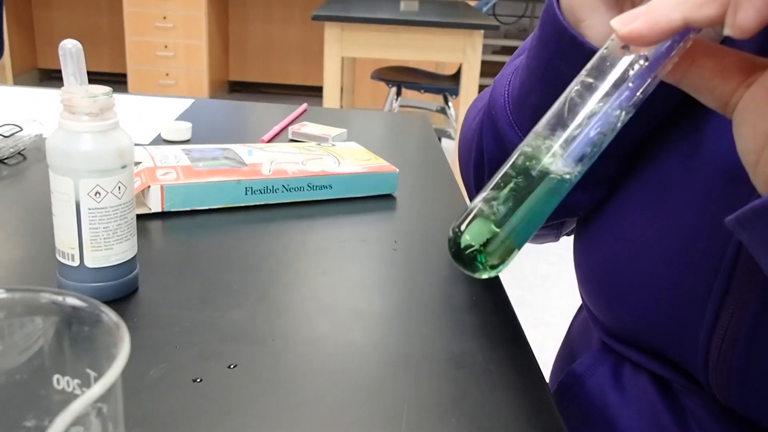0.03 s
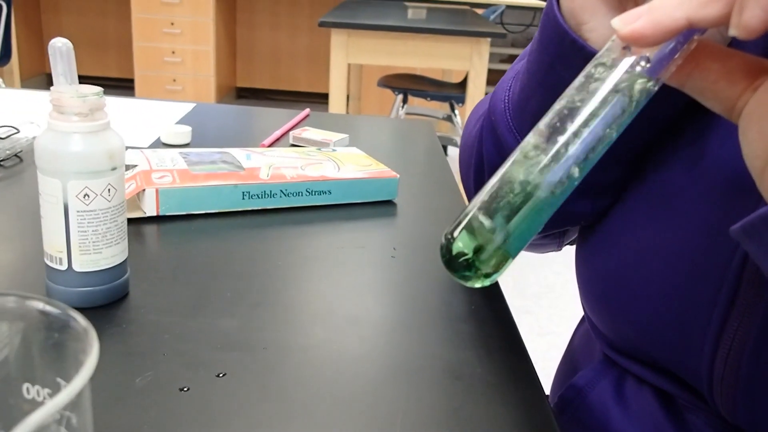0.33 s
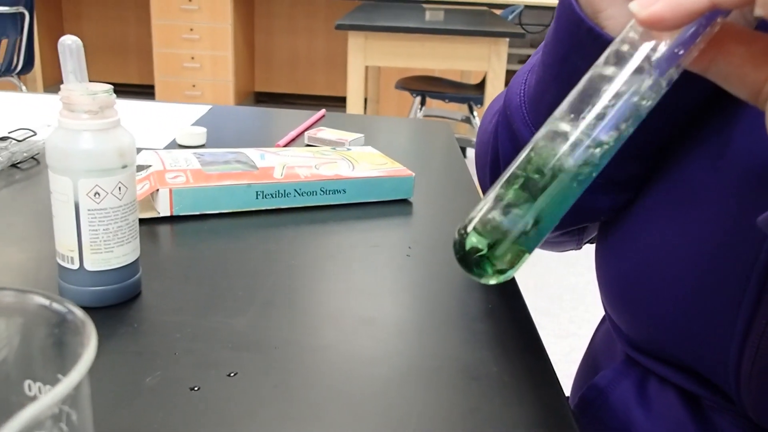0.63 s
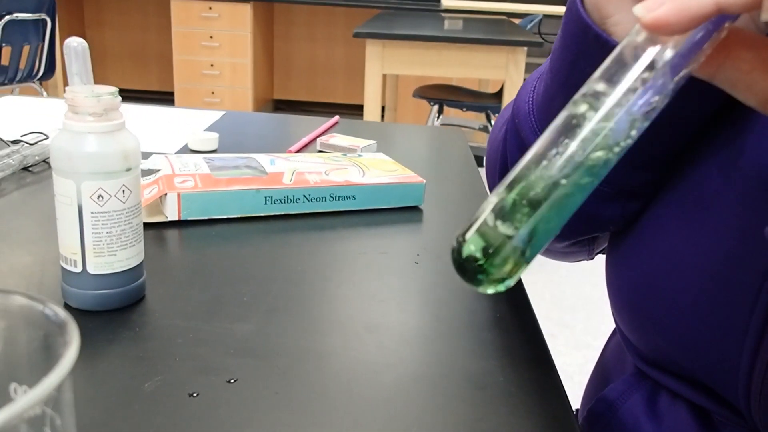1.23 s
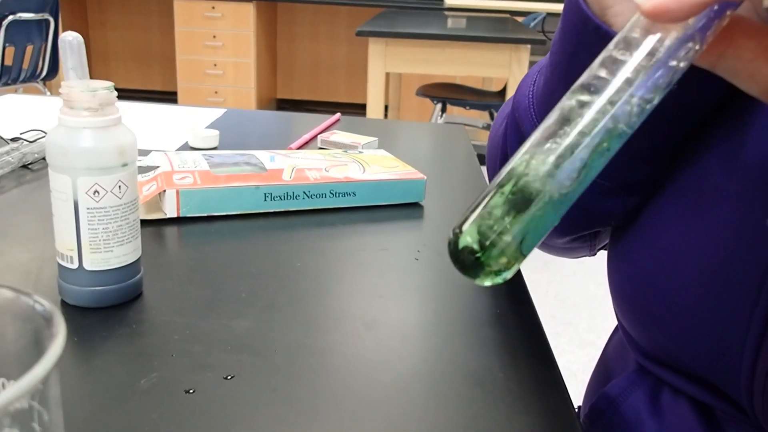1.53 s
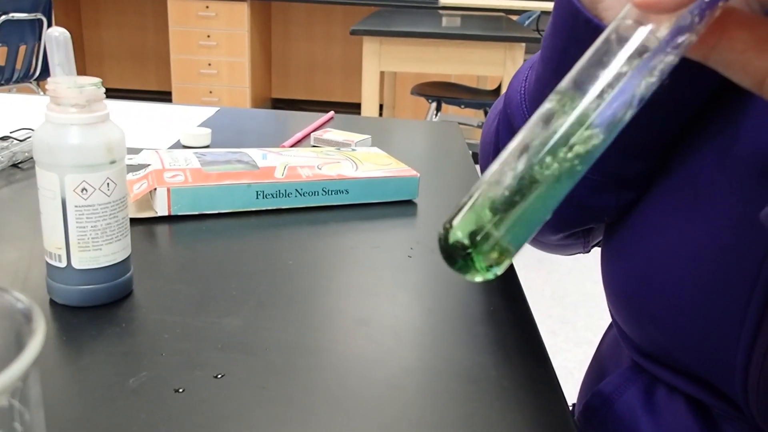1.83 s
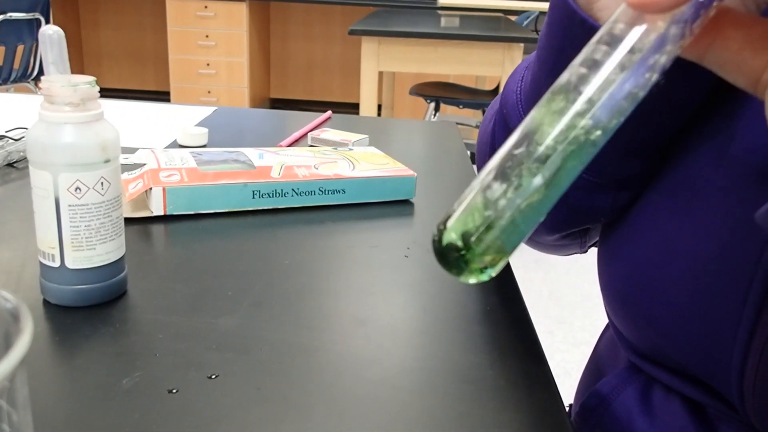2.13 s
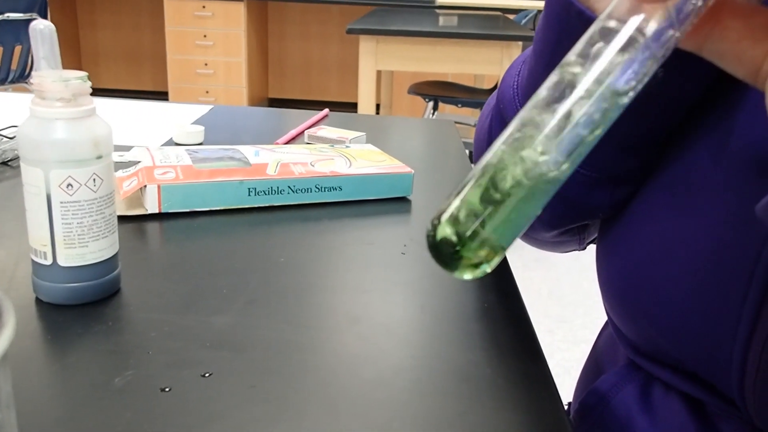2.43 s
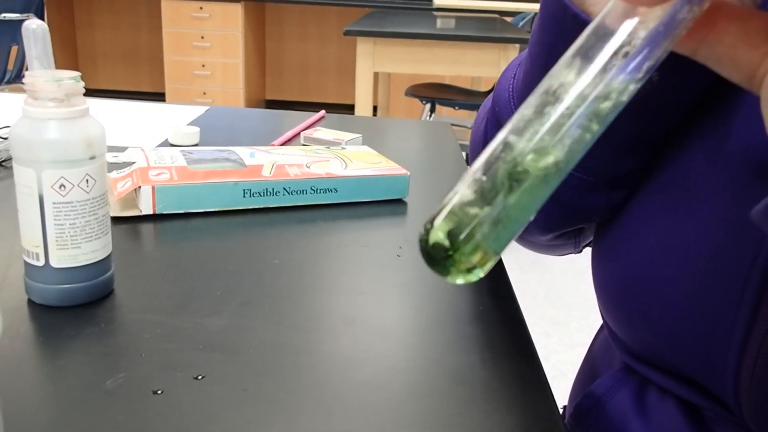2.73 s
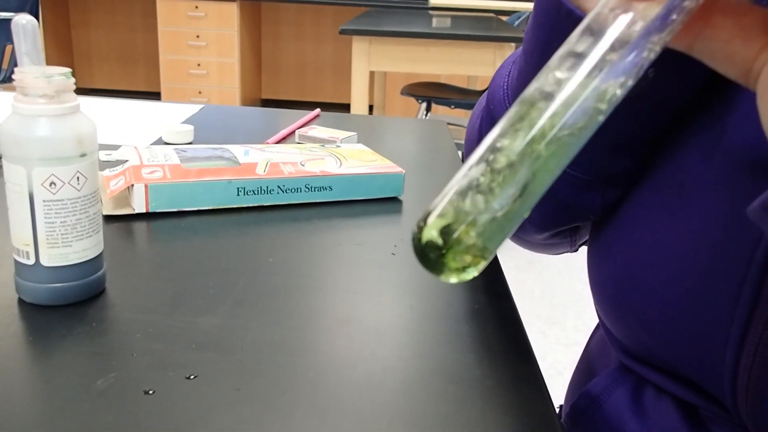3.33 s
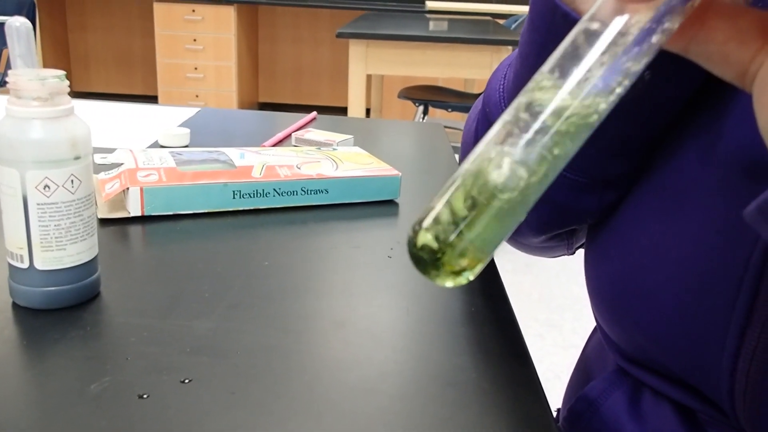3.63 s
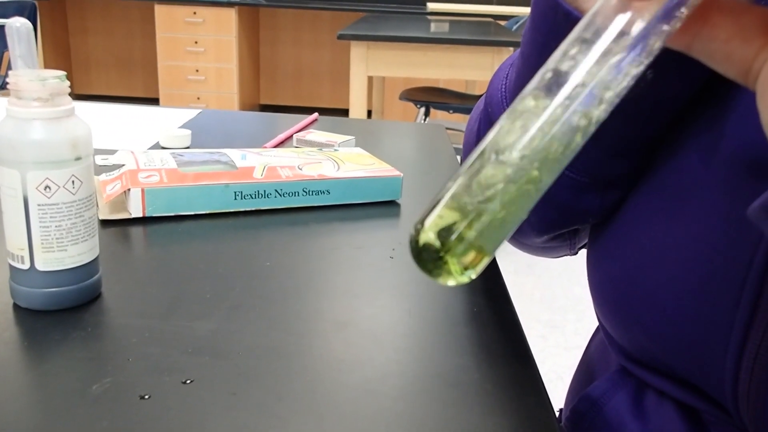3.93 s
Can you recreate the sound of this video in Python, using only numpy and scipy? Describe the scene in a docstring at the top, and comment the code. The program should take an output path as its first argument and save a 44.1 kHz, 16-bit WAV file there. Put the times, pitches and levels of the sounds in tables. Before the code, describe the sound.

Liquid bubbles and fizzes in a test tube for the whole four seconds, close and to the right. Irregular hollow pops and short rising plips mix with tiny ticks of foam. Puffs of air bump the microphone on the left, several in the first second, the strongest at about 2.4 seconds, and a few more after 3 seconds. Faint room ventilation rumbles and hisses underneath.

```python
"""A classroom, close up: liquid fizzes in a hand-held test tube just right of a camera's stereo microphones.
Ventilation rumbles and hisses throughout. From the start, bubbles burst and ring, most rising in pitch,
the air column in the tube answers, and puffs of air bump the left microphone port. Tiny bubbles tick in
the foam all along, and from 0.1 s on an occasional bubble swells with a soft upward glide.
The strongest puff lands at about 2.4 s; the fizzing carries on to the end."""
import sys
import numpy as np
from scipy import signal
from scipy.fft import rfft, irfft, next_fast_len
from scipy.io import wavfile
from scipy.ndimage import map_coordinates

SR = 44100
rng = np.random.default_rng(int(sys.argv[2]) if len(sys.argv) > 2 else 0)


def persist_wave(psi):
    """Save psi, clipped to +-1, as 16-bit WAV."""
    counts = np.round(np.clip(psi, -1, 1) * 32767).astype(np.int16)
    wavfile.write(sys.argv[1], SR, np.atleast_2d(counts).T)


N = 176400
T = np.arange(SR // 8) / SR  # time within one short sound [s]

# room tone, low and high: ventilation spectra (frequency [Hz], relative level [dB])
RUMBLE_COLOUR = [(22, -7), (40, 5.5), (80, 6), (250, -3), (420, -10.5), (510, -4.5), (650, -13), (780, -10),
                 (880, -15.5), (1500, -21.5), (3000, -48.5)]
HISS_COLOUR = [(500, 2.5), (1500, 2.5), (3000, 0.5), (4600, -7.5), (5500, 4.5), (6600, 2), (7700, 8.5),
               (8600, 5), (9400, -3), (10300, 0), (13000, -1), (16000, -1.5)]
# fans and equipment in the room (frequency [Hz], level [dB])
FAN_TONES = [(41.6, -56), (6181, -73.5)]
# bubbles that ring as they open
# (time [s], relative level [dB], pitch [Hz], t60 [s], rise over the t60 [share of pitch])
RINGING_BUBBLES = [(0.0095, -20, 3020, 0.006, 0.0), (0.138, -24, 988, 0.05, 0.074),
                   (0.1372, -22.5, 553, 0.043, 0), (0.3647, -19.5, 520, 0.033, 0.0),
                   (0.4038, -20.5, 650, 0.007, 0.067), (0.4278, -29.5, 1270, 0.028, 0.16),
                   (0.4289, -20.5, 597, 0.03, 0.0), (0.4533, -29, 516, 0.063, 0.73),
                   (0.5689, -28.5, 964, 0.061, 1.26), (0.57, -19.5, 600, 0.021, 1.87),
                   (0.5992, -29.5, 1270, 0.016, 0.3), (0.6016, -18.5, 530, 0.019, 0.15),
                   (0.6998, -22.5, 214, 0.065, 0.12), (0.7536, -32, 1127, 0.051, 0.22),
                   (0.754, -18.5, 334, 0.024, 0.76), (0.7613, -20.5, 468, 0.04, 0.45),
                   (0.7748, -32, 1220, 0.032, 0.54), (0.7744, -30, 468, 0.079, 1.24),
                   (0.8181, -16.5, 640, 0.016, 1.2), (0.823, -44, 1750, 0.068, 0.71),
                   (0.8387, -23, 528, 0.053, 0.29), (0.8392, -26, 1140, 0.013, 0.33),
                   (0.896, -31, 523, 0.077, 0), (0.9459, -32.5, 975, 0.031, 0.055),
                   (1.0222, -26, 224.5, 0.071, 0.094), (1.0793, -31.5, 1360, 0.035, 0.2),
                   (1.0762, -22, 587, 0.033, 0.15), (1.0764, -20, 1060, 0.0059, 0.87),
                   (1.2175, -36, 1510, 0.019, 0), (1.2176, -31.5, 488, 0.083, 0),
                   (1.339, -31, 963, 0.029, 0.64), (1.3719, -23, 1220, 0.0081, 0.2),
                   (1.4517, -25, 410.0, 0.037, 0.57), (1.5905, -36.5, 1490, 0.02, 0),
                   (1.762, -19, 533, 0.021, 0.53), (1.762, -28.5, 975, 0.045, 0.74),
                   (1.7722, -18.5, 477, 0.018, 0.36), (2.0352, -25, 745, 0.037, 0.14),
                   (2.0736, -18, 625, 0.013, 0), (2.0761, -26.5, 890, 0.039, 0.5),
                   (2.0809, -17, 514, 0.026, 0), (2.2067, -22.5, 968, 0.036, 0.79),
                   (2.2084, -25, 522, 0.025, 0.15), (2.2387, -17, 665, 0.013, 0.65),
                   (2.4082, -25.5, 710, 0.044, 0.56), (2.4089, -33, 1422, 0.03, 0.38),
                   (2.5764, -17, 546, 0.016, 0), (2.585, -41, 1418, 0.073, 0.072),
                   (2.5946, -37, 940, 0.046, 0.21), (2.5932, -15.5, 620, 0.014, 0.27),
                   (2.6133, -23.5, 494, 0.023, 1.8), (2.614, -39, 1260, 0.03, 0.18),
                   (2.7705, -17, 554, 0.027, 0.21), (2.7709, -21.5, 1056, 0.02, 0.037),
                   (2.7836, -19.5, 606, 0.015, 0.88), (2.8622, -18, 537, 0.041, 0.06),
                   (2.942, -22, 520, 0.028, 0.0), (2.948, -35, 1003, 0.04, 0.24),
                   (3.027, -26.5, 216, 0.078, 0), (3.111, -23.5, 509, 0.045, 0),
                   (3.1111, -26, 1230, 0.012, 0.72), (3.124, -29, 1497, 0.051, 0.59),
                   (3.1248, -25.5, 2750, 0.018, 0.62), (3.139, -38, 1800, 0.02, 1.1),
                   (3.1702, -29, 562, 0.065, 0.21), (3.1816, -26, 755, 0.087, 0.21),
                   (3.3754, -29.5, 304, 0.067, 0.49), (3.4529, -21, 309, 0.034, 0.7),
                   (3.462, -40, 1680, 0.025, 0.094), (3.529, -35, 2050, 0.03, 0.32),
                   (3.5281, -18, 487, 0.04, 0.17), (3.5902, -26.5, 505, 0.052, 0.1),
                   (3.627, -36, 1840, 0.015, 0.3), (3.698, -19, 553, 0.028, 0.95),
                   (3.8468, -20, 650, 0.023, 1), (3.855, -17, 548, 0.021, 1.26),
                   (3.8975, -26.5, 1050, 0.029, 0.94), (3.898, -29.5, 594, 0.05, 0.099),
                   (3.9607, -30, 1540, 0.017, 0), (3.9622, -17, 645, 0.017, 0.78),
                   (3.9753, -23.5, 3040, 0.01, 0.1)]
# large bubbles that burst at once (time [s], relative level [dB])
LARGE_POPS = [(0.5275, -23), (0.5996, -15.5), (0.7552, -31), (0.943, -27.5), (1.024, -30.5), (1.09, -24.5),
              (1.1397, -24.5), (1.2182, -22), (1.2933, -27.5), (1.3382, -23.5), (1.365, -23), (1.448, -21),
              (1.5348, -26), (1.622, -24), (1.711, -26), (1.848, -25.5), (1.9733, -25), (2.0357, -24.5),
              (2.151, -27.5), (2.2065, -25), (2.329, -26), (2.389, -33), (2.4101, -20.5), (2.4367, -23),
              (2.5224, -24.5), (3.102, -18.5), (3.1934, -26.5), (3.208, -22.5), (3.2825, -21),
              (3.3749, -19.5), (3.4573, -25.5), (3.5281, -20.5), (3.6548, -22.5), (3.7206, -26.5),
              (3.8666, -22), (3.8975, -24.5), (3.921, -30), (3.9599, -19)]
# modes of the air in the tube (frequency [Hz], relative level [dB], t60 [s])
TUBE_MODES = [(330.6, 4, 0.016), (500.4, 3.5, 0.026), (760, -45, 0.0023), (746, -14, 0.082),
              (1092, -37, 0.13), (1594, -21, 0.018), (2170, -50, 0.03), (2925, -29.5, 0.066)]
# the wet splash of a ringing bubble (frequency [Hz], gain [dB])
SPLASH_COLOUR = [(500, -13), (1500, 16), (3000, -27), (3500, -45), (16000, -22)]
# puffs of air on the left port (time [s], relative level [dB])
AIR_PUFFS = [(0.02, -16), (0.209, -15), (0.353, -23), (0.525, -18), (0.752, -13.5), (0.778, -18),
             (0.805, -20.5), (1.186, -23.5), (2.425, -10), (3.078, -18.5), (3.465, -20), (3.484, -20.5),
             (3.555, -23.5)]
# higher tube modes that tiny bubbles reach (frequency [Hz])
UPPER_MODES = [1547, 2040, 2960, 3830, 5300, 7300]
# tiny bubbles snapping (time [s], relative level [dB], pitch [Hz], offset of the bright snap [dB])
FOAM_TICKS = [(0.2874, -39.5, 2900, -3), (0.3927, -38.5, 3900, 6), (0.429, -30.5, 5520, -21),
              (0.4638, -34.5, 3850, -27), (0.577, -35, 2720, -22), (0.591, -37, 6960, -22),
              (0.8108, -39.5, 6860, 5), (1.0213, -43, 2860, -24), (1.079, -36.5, 7440, -17),
              (1.3654, -32, 3940, -32), (1.433, -42, 7200, -7), (1.5194, -35.5, 2630, 1),
              (1.841, -40, 2260, -24), (1.8532, -31, 4960, -14), (2.0788, -39, 5420, -27),
              (2.157, -39, 7480, -21), (2.3203, -39, 2610, -19), (2.471, -41.5, 2470, -24),
              (2.576, -39.5, 5280, -22), (2.586, -36, 7050, -18), (2.7658, -39.5, 8000, -15),
              (2.9462, -33, 3860, -18), (2.9547, -36, 5180, -20), (3.1238, -30, 2855, -1.5),
              (3.236, -41, 5270, -21), (3.3625, -32.5, 5200, -26), (3.529, -39, 3900, -20),
              (3.542, -34, 5730, -20), (3.6489, -35.5, 2650, 5.5), (3.7298, -37.5, 7900, -7),
              (3.961, -36, 5260, -22), (3.9742, -32.5, 3020, -33)]
# a sharp crack leaving the tube (frequency [Hz], gain [dB])
CRACK_COLOUR = [(300, -54), (1500, -3), (2400, -10.5), (2900, 8.5), (3350, -16), (3800, -9), (4600, -7.5),
                (5400, 1.5), (6400, -32), (7300, 3), (9300, -35), (16000, -12)]
# bubbles that swell before they open (time [s], level [dB], starting pitch [Hz])
SWELLING_BUBBLES = [(0.108, -37, 726), (0.3, -49, 1136), (0.406, -29, 478), (0.792, -34, 614.4),
                    (1.298, -35.5, 672), (1.41, -38.5, 557), (1.588, -29, 611), (2.296, -35.5, 537),
                    (2.372, -34.5, 528), (2.524, -34.5, 423), (2.835, -35, 770)]
# the tube at the near (right) and the far (left) port (frequency [Hz], gain [dB])
NEAR_PORT = [(100, -3), (300, 4.5), (800, 1.5), (880, -4.5), (1020, 4), (1560, 9.5), (2400, 5), (2900, 2.5),
             (8000, 3)]
FAR_PORT = [(300, -10.5), (520, -15.5), (1000, -36.5), (3000, -52.5), (5500, -4), (7300, -6)]
# the classroom's decay (frequency [Hz], t60 [s])
ROOM_DECAY = [(200, 0.14), (2000, 0.19), (10000, 0.073)]


def amp(db):
    """Decibels to gain."""
    return 10 ** (np.asarray(db) / 20)


def unit(x):
    """Scale to rms 1."""
    return x / np.sqrt(np.mean(x ** 2) + 1e-20)


def along(points, hz):
    """Interpolate (frequency [Hz], value) points on a log axis."""
    freqs, values = np.transpose(points)
    return np.interp(np.log(hz + 1), np.log(freqs + 1), values)


def fade(t60, t=T):
    """Exponential decay, 60 dB down after t60 seconds."""
    return np.exp(-np.log(1000) * t / t60)


def wobble(knots_per_s):
    """A smooth random curve."""
    return map_coordinates(rng.standard_normal(512), [np.arange(N) * knots_per_s / SR], mode="mirror")


def add(track, s, sound):
    """Mix a sound into a track at s seconds."""
    start = int(np.clip(round(s * SR), 0, N))
    track[start:start + len(sound)] += sound[:N - start]


def coloured(x, points):
    """Minimum-phase filter through (frequency [Hz], gain [dB]) points."""
    size = 2 * next_fast_len(N // 2 + SR // 4)
    hz = np.fft.rfftfreq(size, 1 / SR)
    cepstrum = irfft(np.log(amp(along(points, hz))), size)
    cepstrum[1:size // 2] *= 2
    cepstrum[size // 2 + 1:] = 0
    return irfft(rfft(x, size) * np.exp(rfft(cepstrum)), size)[..., :N]


def ventilation(rumble_db=-41.5, hiss_db=(-51.5, -50.5)):
    """Room tone: rumble partly shared by both ports, separate hiss left and right, faint fan tones."""
    airflow = rng.standard_normal(N) + amp(-1) * rng.standard_normal((2, N))
    rumble = unit(coloured(airflow, RUMBLE_COLOUR))
    hiss = unit(coloured(rng.standard_normal((2, N)), HISS_COLOUR))
    tones = np.zeros(N)
    for hz, db in FAN_TONES:
        phase = 2 * np.pi * hz * np.arange(N) / SR + 2 * wobble(np.sqrt(hz) / 2)
        tones += amp(db) * np.sqrt(2) * np.sin(phase)
    return amp(rumble_db) * rumble + amp(hiss_db)[:, None] * hiss + tones


def bubble_ring(hz, t60, rise=0, blur=0.003):
    """An opening bubble: a damped tone that starts with suction; rise lifts it as the hole widens."""
    attack_s = 0.78 * t60 ** 2  # lasting bubbles open slowly
    envelope = fade(t60) * (1 - np.exp(-T / attack_s))
    line_width_hz = blur * hz
    drift = np.cumsum(rng.standard_normal(len(T))) * np.sqrt(2 * np.pi * line_width_hz / SR)
    phase = 2 * np.pi * hz * (T + rise * T ** 2 / (2 * t60)) + drift
    return -envelope / envelope.max() * np.sin(phase)


def air_column(scatter_db=3, detune=0.032, attack_s=0.00065):
    """The tube's air rings, a little differently each time as the foam heaves."""
    hz, db, t60 = np.transpose(TUBE_MODES)[:, :, None]
    gain, shift = rng.standard_normal((2, len(TUBE_MODES), 1))
    modes = amp(db + scatter_db * gain) * fade(t60) * np.sin(2 * np.pi * hz * (1 + detune * shift) * T)
    return -modes.sum(0) * (1 - np.exp(-T / attack_s))


def film_crack(t60, attack_s=0.00071):
    """A tearing film: a very short burst of noise."""
    return fade(t60) * (1 - np.exp(-T / attack_s)) * rng.standard_normal(len(T))


def bursts():
    """Large bubbles kick the air column; ringing ones add their own note and a splash."""
    body, cracks = np.zeros((2, N))
    for s, db in LARGE_POPS:
        add(body, s, amp(db) * air_column())
    for s, db, hz, t60, rise in RINGING_BUBBLES:
        note = bubble_ring(hz, t60, rise) + amp(-14) * air_column()
        add(body, s, amp(db + 1) * note)
        splash_gain = amp(db - 23) * hz / (480 + hz / 2)  # higher bubbles splash more
        add(cracks, s, splash_gain * film_crack(t60=0.034))
    return body + coloured(cracks, SPLASH_COLOUR)


def pressure_bump(width_s):
    """A pressure peak between two dips, centred 10 ms in."""
    offset = (T - 0.01) / width_s
    return (1 - offset ** 2) * np.exp(-offset ** 2 / 2)


def puffs(lead_s=0.00708, draught_db=-47):
    """Air right on the left port: sharp-edged bumps, each with a ragged wake, over a faint draught."""
    bumps, wake = np.zeros((2, N))
    bump = pressure_bump(width_s=0.002) + amp(-7) * pressure_bump(width_s=0.001)
    for s, db in AIR_PUFFS:
        add(bumps, s - lead_s, amp(db - 2) * bump)
        add(wake, s, amp(db - 12.5) * fade(t60=0.14))
    eddy_colour = [(25, -13), (60, -2.5), (230, -0.5), (330, -7), (600, -33.5), (3000, -63)]
    eddies = unit(coloured(rng.standard_normal(N), eddy_colour))
    draught = amp(draught_db + 4 * wobble(12))
    return bumps + eddies * (wake + draught)


def simmer(per_s=36, level_db=-39, spread_db=2.5, centre_hz=480, cycles=20):
    """Small bubbles open at random between the large ones, pitched around the tube's main note."""
    out = np.zeros(N)
    times = rng.random(1200) * N / SR
    draws = np.clip(rng.standard_normal((1200, 3)), -2, 2)
    for s, (size, pitch, life) in zip(times[:int(per_s * N / SR)], draws):
        hz = centre_hz * 2 ** (pitch / 3)
        t60 = cycles / np.sqrt(hz * centre_hz) * 2 ** (life / 4)
        add(out, s, amp(level_db + spread_db * size) * bubble_ring(hz, t60, rise=0.45))
    return out


def foam(ring_t60=0.026, fizz_per_s=38, fizz_db=-49.5, spread_db=4):
    """Tiny bubbles spit, a few clearly, many faintly; the faint ones sound the tube's upper modes."""
    notes, cracks = np.zeros((2, N))
    for s, db, hz, snap_db in FOAM_TICKS:
        note = amp(db + 0.5) * bubble_ring(hz, ring_t60, blur=0.088)
        snap = amp(db + snap_db + 1) * film_crack(t60=0.012)
        add(notes, s, note + snap)
        add(cracks, s, amp(db + 4) * film_crack(t60=0.028, attack_s=0.00076))
    times = rng.random(800) * N / SR
    sizes = np.clip(rng.standard_normal(800), -2, 2)
    pitches = rng.choice(UPPER_MODES, 800)
    for s, size, hz in zip(times[:int(fizz_per_s * N / SR)], sizes, pitches):
        plip = bubble_ring(hz, ring_t60, blur=0.12) + amp(-7) * film_crack(t60=0.004)
        add(notes, s, amp(fizz_db + spread_db * size) * plip)
    return notes + coloured(cracks, CRACK_COLOUR)


def swelling(length_s=0.0433, rise=0.381, flutter_per_s=220, flutter_db=4):
    """A bubble rises through the surface: a soft note glides upward, fluttering as the foam shifts."""
    out = np.zeros(N)
    envelope = np.sin(np.pi * np.minimum(T / length_s, 1))
    for s, db, hz in SWELLING_BUBBLES:
        flutter, drift = [wobble(flutter_per_s)[:len(T)] for _ in range(2)]
        phase = 2 * np.pi * hz * (T + rise * T ** 2 / (2 * length_s)) + drift / 2
        add(out, s, amp(db + flutter_db * flutter) * envelope * np.sin(phase))
    return out


def classroom(x, wet_db=(-19.5, -14.5)):
    """The room's short reverberation, left and right, faint with the tube this close."""
    hz, t, spectrum = signal.stft(rng.standard_normal((2, SR // 2)), SR, nperseg=256)
    decay = fade(along(ROOM_DECAY, hz)[:, None], t)
    tail = signal.istft(spectrum * decay, SR, nperseg=256)[1]
    tail /= np.linalg.norm(tail[0])
    return amp(wet_db)[:, None] * signal.fftconvolve(x[None], tail, axes=1)[:, :N]


def scene():
    """The tube faces the right port from close by; the left one hears it shaded and takes the puffs."""
    air = ventilation()
    air[0] += puffs()
    tube = bursts() + swelling() + simmer() + foam()
    left = coloured(tube, FAR_PORT)
    right = coloured(tube, NEAR_PORT)
    return np.array([left, right]) + classroom(right) + air


def record(dry):
    """The camera keeps nothing above its band limit."""
    size = next_fast_len(N + SR // 2)
    hz = np.fft.rfftfreq(size, 1 / SR)
    return irfft(rfft(dry, size) * (hz < 15950), size)[:, :N]


dry = scene()
out = record(dry)
persist_wave(out)
```